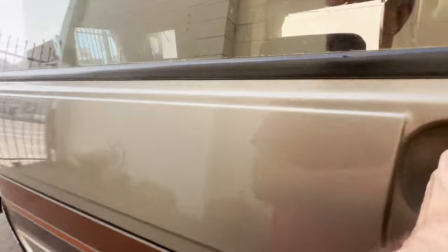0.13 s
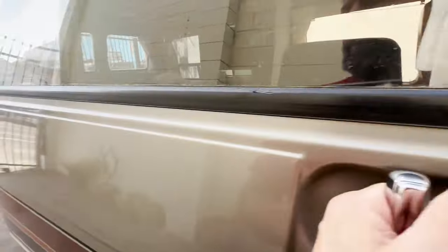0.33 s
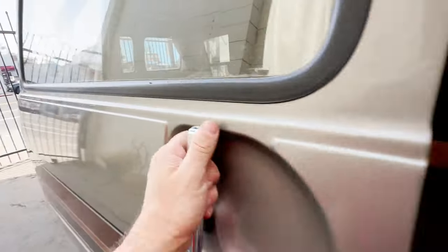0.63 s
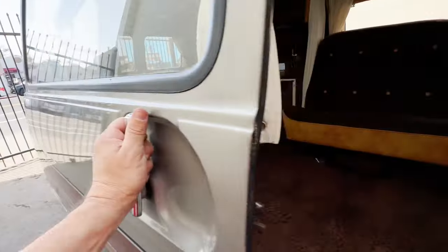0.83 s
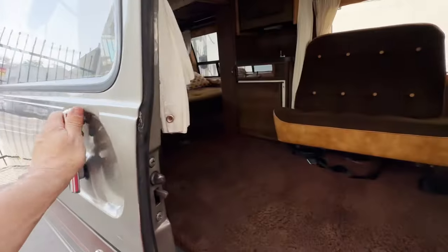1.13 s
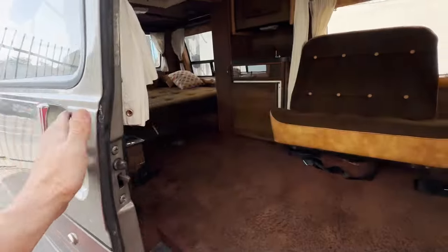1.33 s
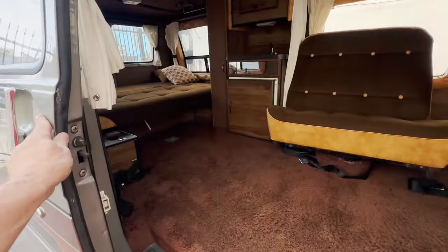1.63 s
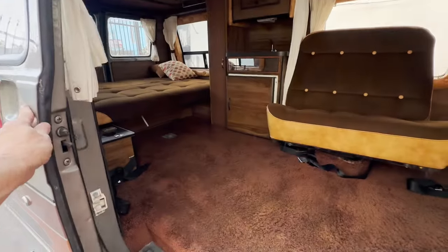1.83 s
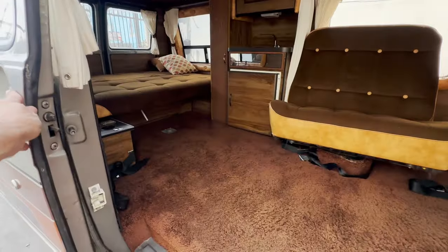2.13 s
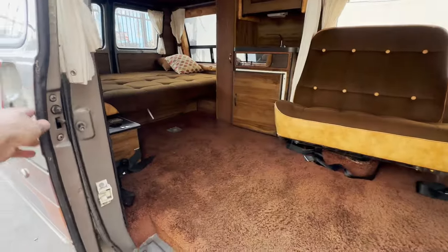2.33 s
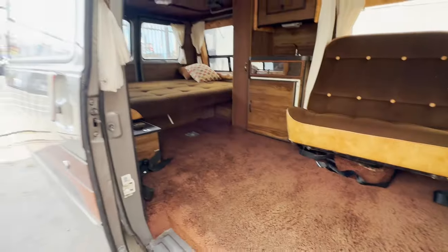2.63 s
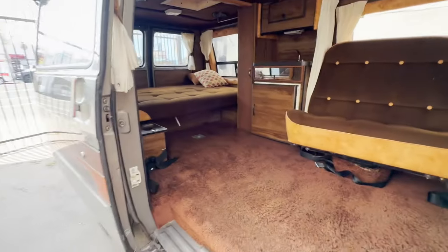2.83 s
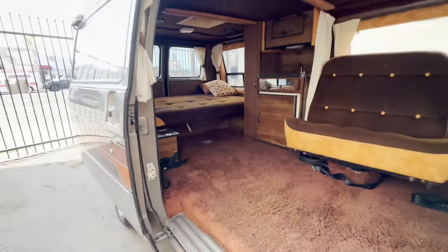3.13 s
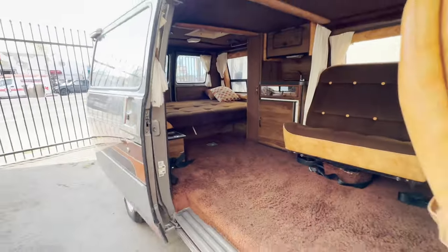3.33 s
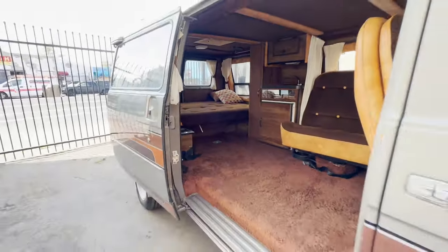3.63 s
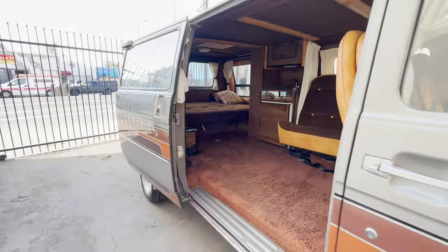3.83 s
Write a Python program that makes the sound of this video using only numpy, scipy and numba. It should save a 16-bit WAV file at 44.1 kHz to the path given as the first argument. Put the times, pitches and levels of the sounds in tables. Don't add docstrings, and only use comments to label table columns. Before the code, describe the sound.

Close stereo phone pickup outdoors: van side door clacks loose, rollers rumble and rattle over bumps from right to left, then quiet distant traffic and shoes crunching grit on concrete.

```python
import sys
import numpy as np
from scipy import signal
from scipy.fft import rfft, irfft
from scipy.io import wavfile
from scipy.ndimage import uniform_filter1d, map_coordinates
from numba import njit

SR = 44100
rng = np.random.default_rng(int(sys.argv[2]) if len(sys.argv) > 2 else 0)


def invert_db(x):
    u = np.asarray(x, float) / 20
    return 10 ** u


def master(y):
    cut = np.clip(np.atleast_2d(y).T, -1, 1)
    pcm = np.round(cut * 32767)
    wavfile.write(sys.argv[1], SR, pcm.astype(np.int16))


N = 176400

# start_s, left_late_samples, left_over_right_db
DOOR_PATH = [
    (0, 27, 0.5),
    (.7, 14.5, 2),
    (1.3, -9, 1.5),
    (1.6, -17, 0.5),
    (4, -13, 3.5),
]
CABIN_T60_S = 0.23
ALIKE_HZ = 378


def tone(x, table):
    hz, db = np.array(table).T
    n = N + SR // 2
    log_hz = np.log(np.arange(n // 2 + 1) * SR / n + 1)
    gain = invert_db(np.interp(log_hz, np.log(hz), db))
    return irfft(rfft(x, n) * gain, n)[..., :N]


def unit(x):
    return x / np.sqrt(np.mean(x ** 2))


def curve(table, axis):
    rows = np.array(table)
    return np.interp(np.arange(N) / SR, rows[:, 0], rows[:, axis])


def walk(rate_hz):
    hold = int(SR / rate_hz)
    steps = np.repeat(rng.standard_normal(N // hold + 1), hold)
    return unit(uniform_filter1d(steps, hold)[:N])


def decay(t, rise_s, t60_s):
    t = np.maximum(t, 0)
    return (1 - np.exp(-t / rise_s)) * invert_db(-60 * t / t60_s)


@njit
def svf(x, hz, damp):
    band, low = np.empty(len(x)), np.empty(len(x))
    band_state, low_state = 0., 0.
    for i in range(len(x)):
        g = np.tan(np.pi * hz[i] / SR)
        v = (band_state + g * (x[i] - low_state)) / (1 + g * (g + damp))
        low[i] = low_state + g * v
        band_state = 2 * v - band_state
        low_state = 2 * low[i] - low_state
        band[i] = damp * v
    return band, low


def ring(x, hz, width_hz):
    return svf(x, np.full(len(x), float(hz)), width_hz / hz)[0]


def panel(x):
    # frequency_hz, level_db
    skin = [(24, -63), (40, -12), (117, 0), (461, -3.5), (859, -7), (1050, -11.5), (2110, -24.5),
            (10100, -57), (15500, -85)]
    # centre_hz, width_hz, level_db
    modes = [(122.3, 24, -0.5), (211, 45, 1), (320, 41, 2.5), (367.6, 45, 0), (421.4, 58, 1.5),
             (552, 49, -1.5), (603.4, 18, 1.5), (700, 94, -9), (900, 6.3, -32), (1200, 160, -5.5),
             (1996, 200, -9), (2380, 220, -11.5), (4500, 330, -2.5)]
    x = tone(x, skin)
    return x + sum(invert_db(db + 2 * walk(22)) * ring(x, hz, width) for hz, width, db in modes)


def thuds(t):
    # start_s, level_db, pitch_hz, t60_s
    strikes = [(.005, -18, 38.4, .5), (.008, -12, 105, 0.26), (.04, -17, 142, .25), (.045, -15, 60.7, 0.35),
               (.14, -18, 51.5, 0.47), (.25, -22.5, 44.3, 0.5), (-.01, -21, 864, 0.29),
               (.168, -14.5, 198.5, 0.38), (.22, -10.5, 207, 0.11), (.245, -15.5, 207, 0.35),
               (.307, -16, 642, 0.15), (.31, -18.5, 209, 0.27), (.333, -12, 211.5, 0.39),
               (.385, -14.5, 198.2, 0.36), (.455, -12.5, 290.8, 0.35), (.59, -20, 426, 0.34),
               (.53, -16, 204.8, 1), (1.26, -20.5, 187.5, 0.45), (2.069, -24.5, 127.5, 1),
               (.045, -22.5, 700, 0.36), (.051, -22, 1288, .31), (.915, -20, 856, 0.13),
               (1.075, -15, 255.6, 0.17), (1.245, -17, 560.6, 0.17), (1.535, -19.5, 861, 0.16),
               (2.02, -30, 764, 0.1), (2.316, -35, 604, 0.13)]
    out = 0
    for start, db, hz, t60 in strikes:
        since = t - start
        out = out + invert_db(db) * decay(since, 0.32 / hz, t60) * np.sin(2 * np.pi * hz * since)
    return out


def bumps(t):
    # start_s, peak_db, brightness_0_to_1
    hits = [(0.0024, -20.5, 0.34), (0.0403, -18, 0.7), (0.0604, -18, 0.76), (0.126, -18, 0.4),
            (0.2044, -23, 0.42), (0.297, -23.5, 0.2), (0.464, -19.5, 0), (0.5836, -30.5, 0.6),
            (0.6106, -16, 0.1), (0.769, -25, 0), (0.876, -22, 0.14), (0.974, -20, 0.18),
            (1.091, -25.5, 0.3), (1.23, -25.5, 0.45), (1.3593, -24, 0.2), (1.5355, -26, 0.28),
            (1.69, -22, 0), (1.9689, -44, 0.7), (2.008, -43.5, 0.7), (2.0492, -40.5, 0.5),
            (2.383, -48, 0.14)]
    noise = panel(rng.standard_normal(N))
    dull = unit(tone(noise, [(300, -72), (800, -7), (2600, 7), (16000, 0)]))
    bright = unit(tone(noise, [(300, -72), (800, -7), (2600, 7), (16000, 24)]))
    out = 0
    for start, db, brightness in hits:
        envelope = decay(t - start, rise_s=.004, t60_s=.065)
        out = out + invert_db(db + 4) * envelope * (dull + brightness * bright)
    return invert_db(-5.5) * out * invert_db(3.3 * walk(250))


def rolling(t):
    # start_s, level_db, contact_resonance_hz (rises with speed), loose_roller_rattle_db
    run = [(0, -16.5, 165, 8), (.1, -17, 181, -3), (.2, -18, 209, 7), (.45, -18, 261, 2), (.6, -18, 270, 0),
           (.72, -19, 272, 5), (1.1, -18.5, 324, 1.5), (1.3, -20.5, 320, 5.5), (1.55, -20, 340, -1),
           (1.75, -21.5, 366, -6), (1.8, -26, 322, -6), (2.0, -27.5, 290, -7), (2.12, -30.5, 196, -2),
           (2.33, -35, 202, 7), (2.375, -37.5, 125, -8), (2.49, -46, 119, -15), (2.6, -44, 130, 0)]
    contact_hz, rattle_hz, grit_per_s = 330, 1230, 500
    grit_hits = (rng.random(N) < grit_per_s / SR) * rng.standard_normal(N)
    grit = grit_hits * invert_db(3.5 * rng.exponential(size=N))
    rough = rng.standard_normal(N) + invert_db(-5) * unit(grit)
    contact = svf(rough, curve(run, axis=2), 0.92)[1]
    roll = panel(tone(contact, [(contact_hz, 0), (contact_hz * 64, 70)]))
    rattle = tone(roll, [(rattle_hz / 2, -30), (rattle_hz * 2, 0)])
    roll = roll + rattle * (invert_db(curve(run, axis=3) + 2 * walk(30.82)) - 1)
    roll = roll / np.sqrt(uniform_filter1d(roll ** 2, size=5000))
    judder_db = walk(13.48)
    stop = np.clip((run[-1][0] - t) / 0.04, 0, 1)
    return roll * invert_db(curve(run, axis=1) + judder_db) * stop


def crackle(t, table, gain_db):
    noise = rng.standard_normal(N) * invert_db(2.7 * walk(600))
    out, length = np.zeros(N), 12000
    for start, db, hz, t60, share in table:
        first = int(start * SR)
        part = slice(first, first + length)
        width = share * hz
        band = unit(ring(ring(noise[part], hz, width), hz, width))
        out[part] += invert_db(db + gain_db) * decay(t[part] - start, .05 * t60, t60) * band
    return out


def handle_ticks(t):
    # start_s, peak_db, centre_hz, t60_s, width_as_share_of_centre
    ticks = [(.002, -31.5, 10500, 0.024, 1.8), (.043, -24.5, 4500, 0.034, 0.86),
             (0.049, -20, 4470, .04, 0.6), (.051, -30, 10500, .02, .8), (.059, -37, 12000, 0.054, 1),
             (0.067, -24, 5400, 0.017, 1.2), (.116, -46, 10000, 0.025, .5), (.138, -30, 4800, 0.015, 0.52),
             (.195, -50, 8950, .02, 1.5), (.207, -44, 13100, .03, 0.66), (.213, -41, 10500, .03, 1),
             (.233, -46, 14200, .04, .7), (.241, -36.5, 6050, 0.033, .15), (.277, -38, 9000, 0.022, 2),
             (.297, -52, 15000, 0.064, .15), (.615, -48, 12300, .04, 1), (0.896, -44.5, 8950, 0.034, 1.2),
             (1.198, -43, 12000, 0.033, 1), (1.362, -42, 5000, 0.031, 1), (1.691, -38, 4950, 0.038, 0.59),
             (2.533, -43.5, 2640, 0.041, .12), (2.533, -50, 3700, 0.034, .25)]
    return crackle(t, ticks, 0.9)


def cabin(x):
    hop = int(.12 * SR)
    t = np.arange(SR // 4) / SR
    out = np.zeros((2, N + SR))
    fade = np.sqrt(signal.get_window("hann", 2 * hop))
    log_hz = np.log(np.arange(len(t) // 2 + 1) * 4 + 1)
    colour_hz = [ALIKE_HZ / 3, ALIKE_HZ * 2, 6000, 14000]
    colour = invert_db(np.interp(log_hz, np.log(colour_hz), [-12.5, 0, 0, -8]))
    envelope = decay(t - .002, 0.00042, CABIN_T60_S)
    x = np.pad(x, (hop, 2 * hop))
    for i in range(0, N + hop, hop):
        echoes = rng.standard_normal((2, len(t))) * envelope
        tail = irfft(rfft(echoes) * colour)
        wet = signal.fftconvolve((x[i:i + 2 * hop] * fade)[None], tail, axes=1)
        out[:, i:i + wet.shape[1]] += wet
    tail_gain = np.sqrt(CABIN_T60_S * SR / np.log(1e6))
    return out[:, hop:hop + N] * invert_db(0.5) / tail_gain


def pair(x):
    side = tone(x[1], [(ALIKE_HZ / 8, -16), (ALIKE_HZ * 2, 0)])
    return x[0] + side * np.array([[1], [-1]])


def traffic():
    # frequency_hz, level_db
    road_tone = [(15, -44), (25, -23), (55, -0.5), (221, -13), (400, -16.5), (560, -17), (780, -15),
                 (1200, -21.5), (15500, -77.5)]
    out, swell = 0, walk(0.68)
    for hz in 30 * 2 ** np.arange(0, 9.1, .5):
        gain = invert_db(1.2 * swell + 1.75 * walk(6.21))
        bands = np.array([ring(rng.standard_normal(N), hz, hz / 3) for _ in range(2)])
        out = out + bands * gain
    level_db = -41.5 + 0.88 * np.arange(N) / N
    left, right = unit(pair(tone(out, road_tone))) * invert_db(level_db)
    return np.array([left, np.roll(right, shift=int(-DOOR_PATH[-1][1]))])


def scuff():
    # start_s, level_db
    drag = [(0, -53.5), (1.7, -54), (1.8, -59.5), (2.5, -64), (2.85, -60), (3.15, -59), (3.27, -68.5),
            (3.41, -87), (3.46, -64), (3.64, -66), (3.7, -57.5), (4, -60)]
    # frequency_hz, level_db
    drag_tone = [(1500, -1), (3000, 5), (6000, 6), (10000, 2.5), (15500, -10.5)]
    noise = unit(tone(rng.standard_normal((2, N)), drag_tone))
    return pair(noise * invert_db(curve(drag, axis=1) + walk(44))) * invert_db(-2.5)


def squeak(t):
    # start_s, length_s, pitch_from_hz, pitch_to_hz, level_db
    partials = [
        (1.941, .08, 1590, 1662, -38),
        (1.961, .065, 1720, 1778, -36.5),
        (1.928, .015, 1400, 1500, -41),
    ]
    direct = 0
    for start, length, from_hz, to_hz, db in partials:
        progress = np.clip((t - start) / length, 0, 1)
        glide = to_hz - (to_hz - from_hz) * np.exp(-progress / 0.25)
        hz = glide * (1 + .016 * walk(160))
        envelope = np.abs(np.sin(np.pi * progress)) ** .25
        direct = direct + invert_db(db) * np.sin(2 * np.pi * np.cumsum(hz) / SR) * envelope
    gap_s, yard_t60_s = .02, 3.2
    yard = rng.standard_normal((2, N)) * decay(t - gap_s, .03, yard_t60_s) * invert_db(-35)
    return direct + signal.fftconvolve(direct[None], yard, axes=1)[:, :N]


def shoe_grit(t):
    # start_s, peak_db, centre_hz, t60_s, width_as_share_of_centre
    crunches = [(2.905, -42, 10100, 0.09, 2), (2.922, -37, 15000, 0.082, 0.65),
                (2.925, -39, 8000, 0.099, 1.1), (2.929, -35, 3360, 0.042, 0.9),
                (2.942, -41, 2800, 0.04, 1.3), (2.959, -42, 11000, .07, 2.5), (3.031, -58, 5000, .03, 2.2),
                (3.048, -36.5, 3840, 0.037, .8), (3.059, -46, 9800, .05, .1), (3.06, -53, 15200, .12, .08),
                (3.086, -38, 3120, 0.022, 0.71), (3.094, -44, 10500, .06, 1),
                (3.118, -41, 3000, 0.041, 1.5), (3.135, -39, 7000, 0.023, 3.3),
                (3.137, -38, 3540, 0.033, .6), (3.145, -62, 11000, 0.037, 1.5),
                (3.167, -58, 3200, 0.027, .6), (3.16, -53, 2130, 0.63, 0.056),
                (3.427, -44.5, 13500, .046, 1.3), (3.55, -47, 3500, 0.069, .8),
                (3.613, -39, 6000, 0.042, 1.8), (3.66, -39, 2880, 0.042, .3), (3.672, -37, 9000, 0.092, 3),
                (3.685, -32.5, 10900, 0.081, 5.7), (3.71, -52, 8300, 0.46, 0.032),
                (3.71, -55, 15200, 0.49, .1), (3.745, -58, 9800, 0.13, .08),
                (3.764, -37, 3030, 0.042, 0.97), (3.767, -47, 5240, .03, 0.25),
                (3.803, -37, 11000, .08, 2.2), (3.81, -55, 15200, .1, .1), (3.846, -28, 12000, 0.039, 0.83),
                (3.847, -40.5, 6800, 0.061, 0.34), (3.88, -50, 3000, .04, .2), (3.87, -46, 2100, 0.95, .08),
                (3.927, -53, 14500, .075, .4), (3.968, -34, 6000, 0.035, 1.3)]
    return crackle(t, crunches, -4)


def scene():
    t = np.arange(N) / SR
    door = rolling(t) + bumps(t) + thuds(t)
    clicks = shoe_grit(t) + handle_ticks(t)
    near = door + clicks
    low = tone(near, [(15000, 0), (15000, -30)])
    side = np.array([[.5], [-.5]])
    arrival = np.arange(N) - side * curve(DOOR_PATH, axis=1)
    direct = map_coordinates(low, [arrival], mode="nearest") + near - low
    panned = direct * invert_db(side * curve(DOOR_PATH, axis=2))
    room = cabin(door + invert_db(-5.5) * clicks)
    return panned + room + scuff() + squeak(t) + traffic()


def top_cut(x):
    return signal.sosfilt(signal.butter(12, 16020, fs=SR, output="sos"), x)


def record(dry):
    # centre_hz, width_hz
    port_notches = [(5230, 90), (7560, 200), (7560, 160)]
    for hz, width in port_notches:
        dry = dry - .95 * np.array([ring(channel, hz, width) for channel in dry])
    mix = tone(dry, [(15800, 0), (15900, -60)])
    return top_cut(mix)


dry = scene()
out = record(dry)
master(out)
```